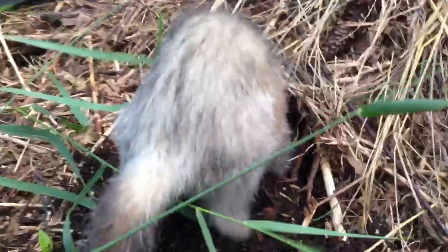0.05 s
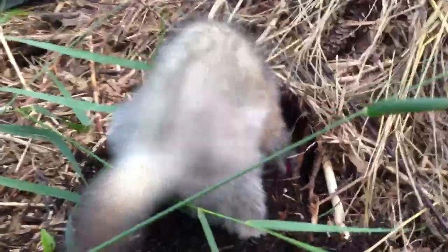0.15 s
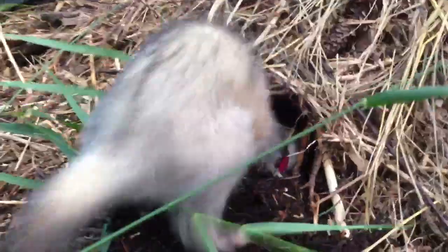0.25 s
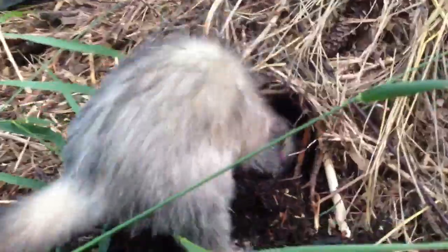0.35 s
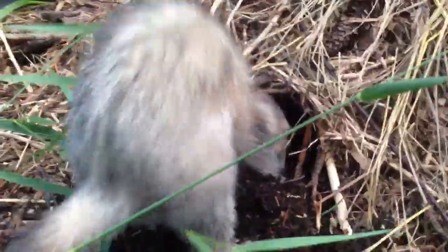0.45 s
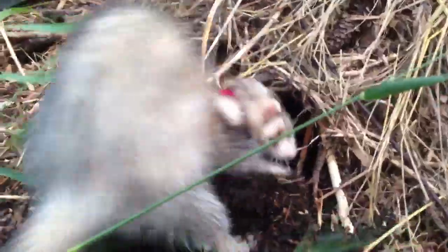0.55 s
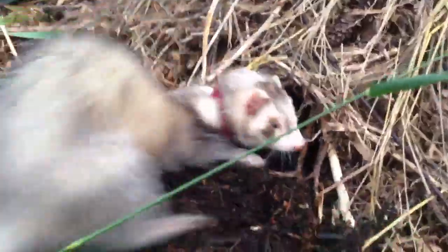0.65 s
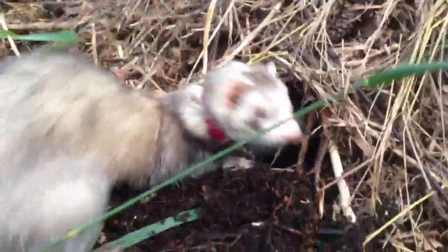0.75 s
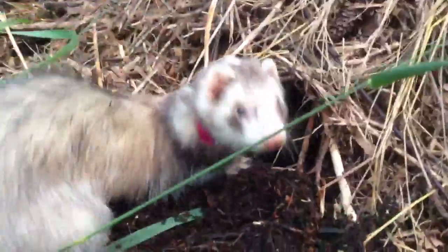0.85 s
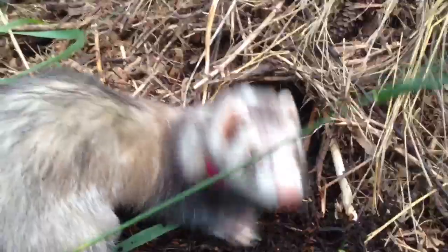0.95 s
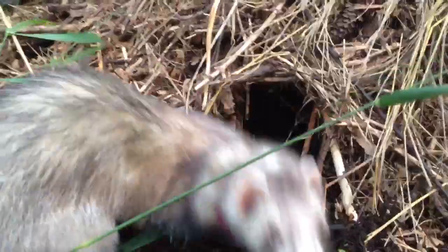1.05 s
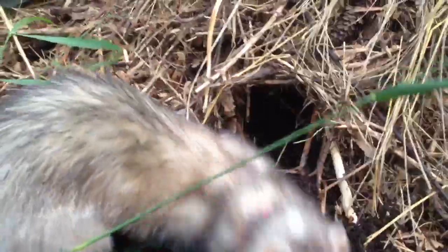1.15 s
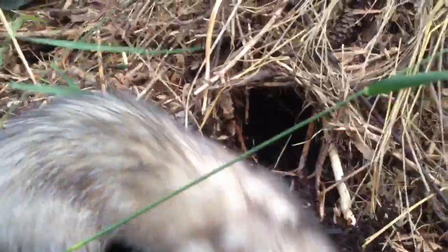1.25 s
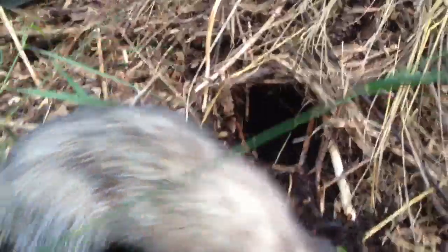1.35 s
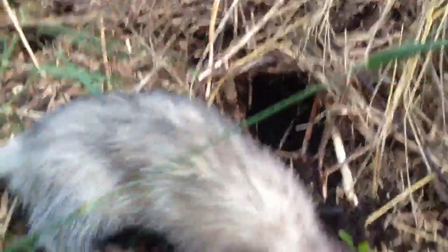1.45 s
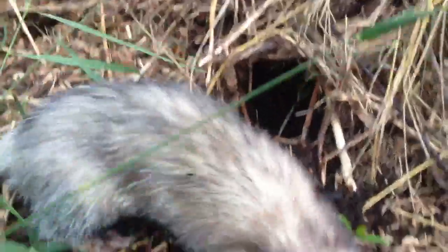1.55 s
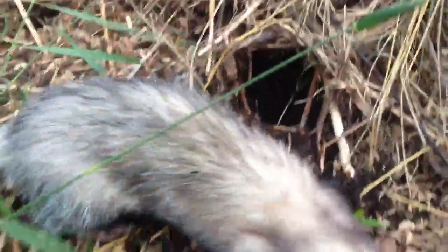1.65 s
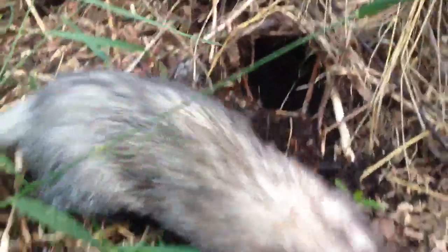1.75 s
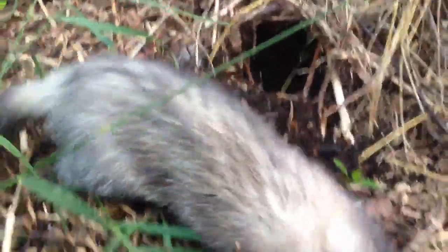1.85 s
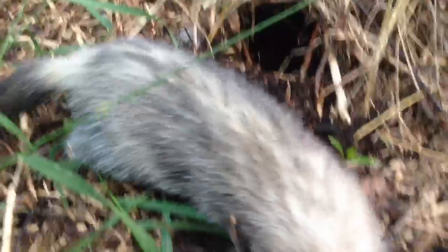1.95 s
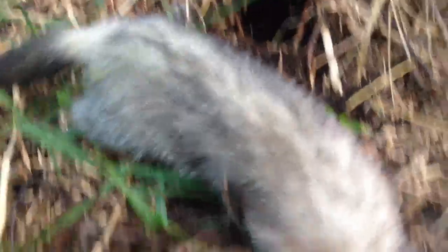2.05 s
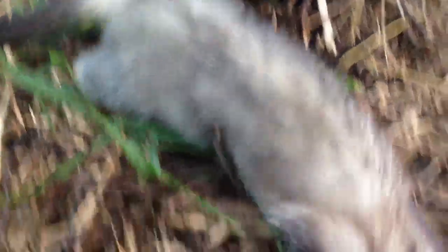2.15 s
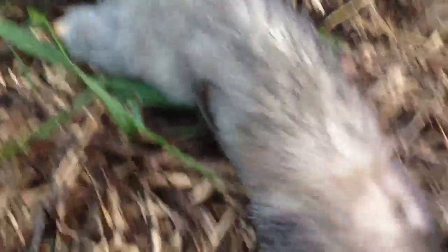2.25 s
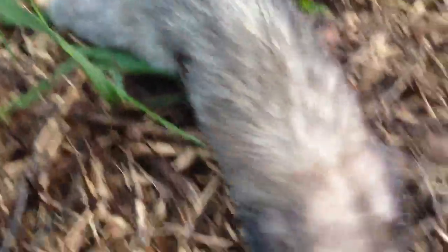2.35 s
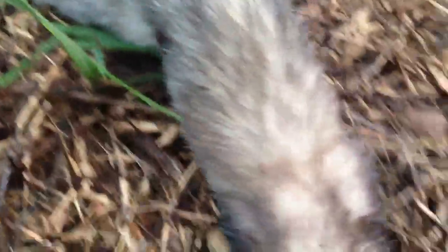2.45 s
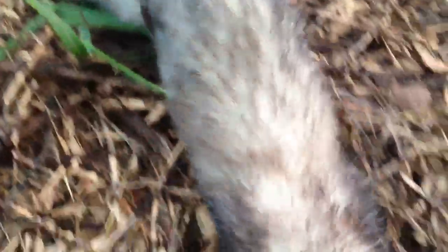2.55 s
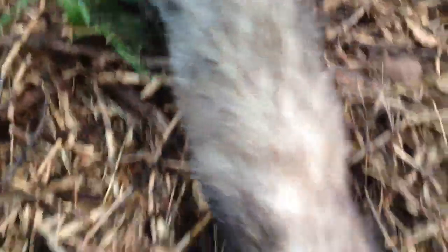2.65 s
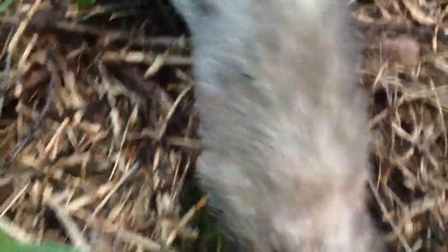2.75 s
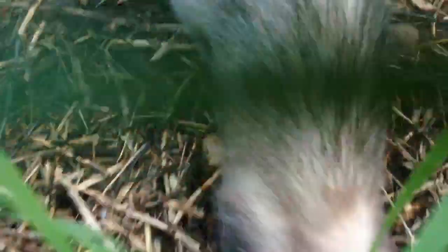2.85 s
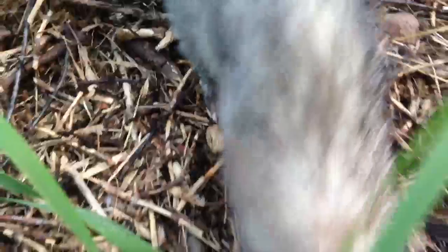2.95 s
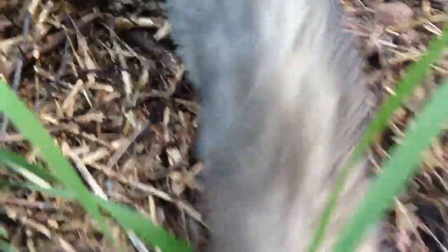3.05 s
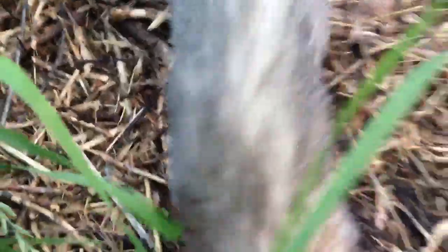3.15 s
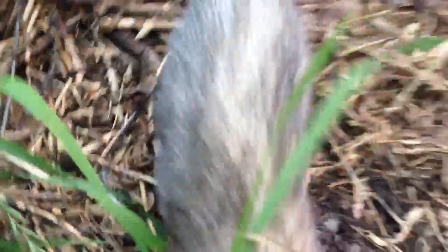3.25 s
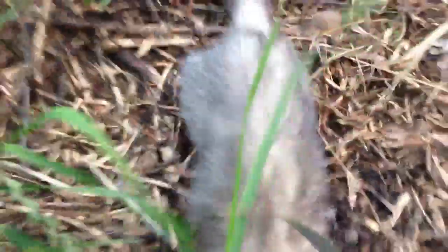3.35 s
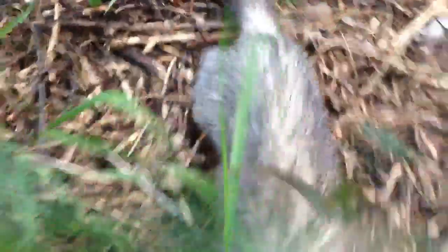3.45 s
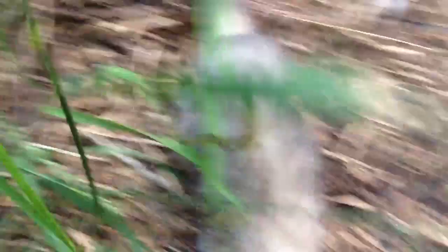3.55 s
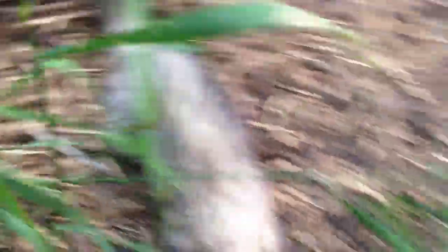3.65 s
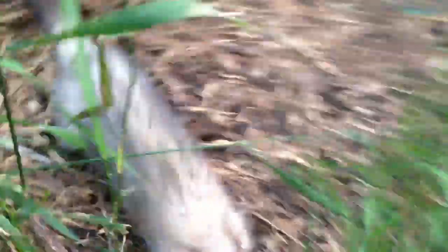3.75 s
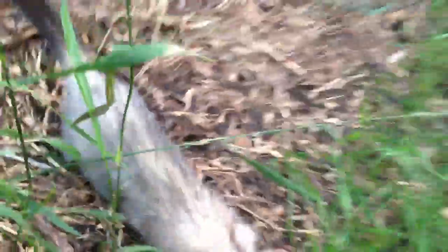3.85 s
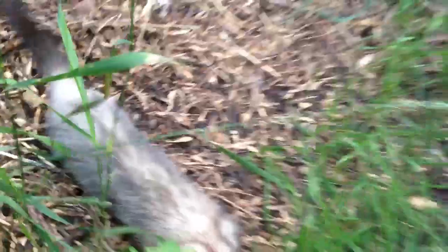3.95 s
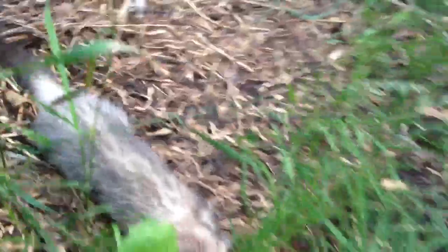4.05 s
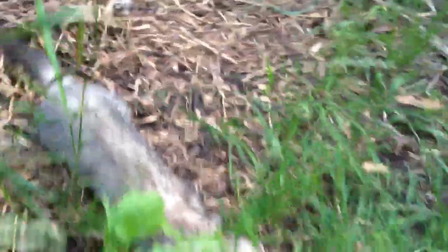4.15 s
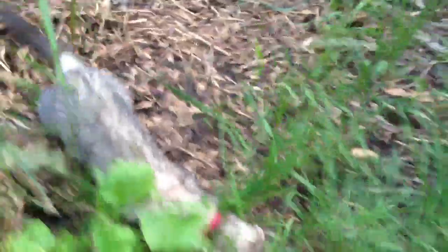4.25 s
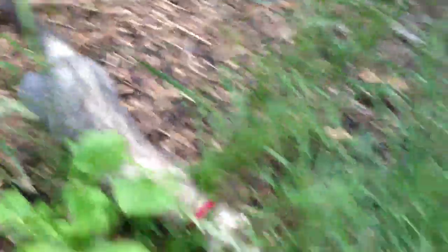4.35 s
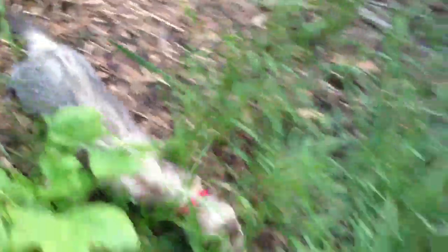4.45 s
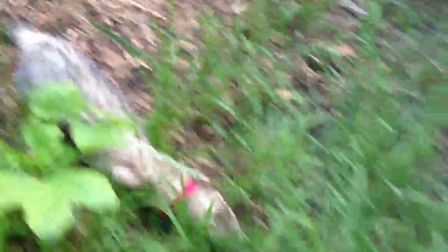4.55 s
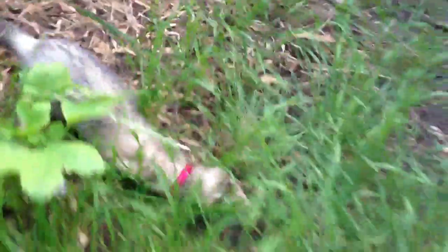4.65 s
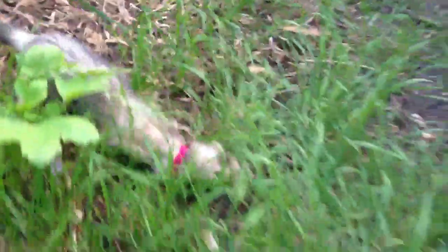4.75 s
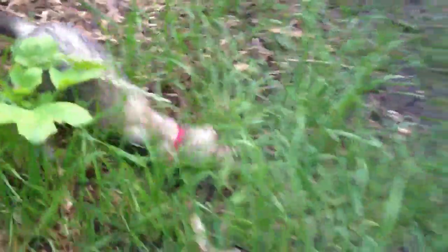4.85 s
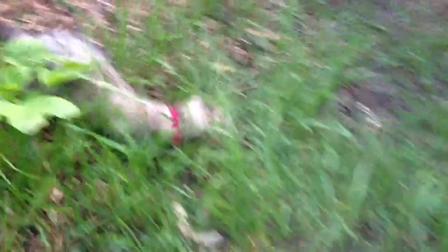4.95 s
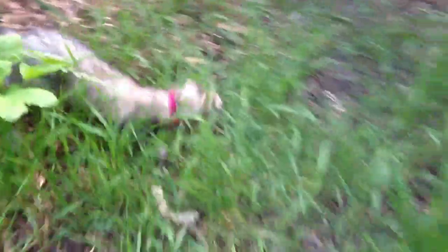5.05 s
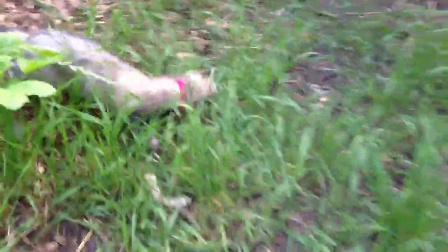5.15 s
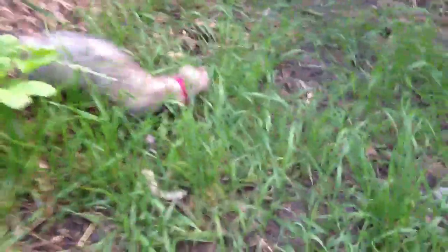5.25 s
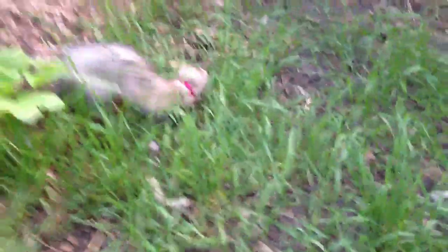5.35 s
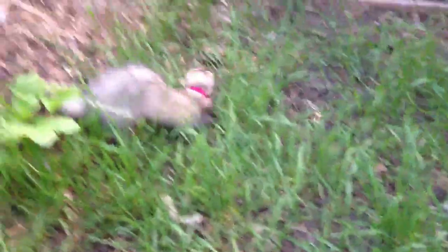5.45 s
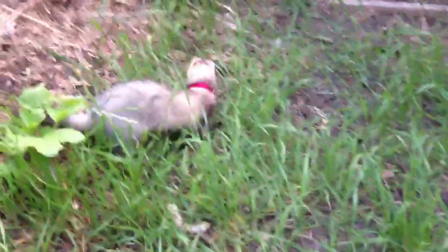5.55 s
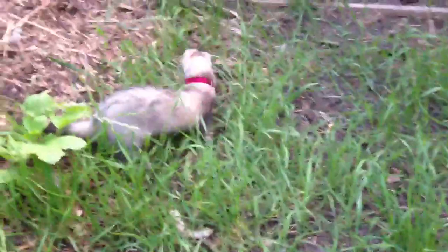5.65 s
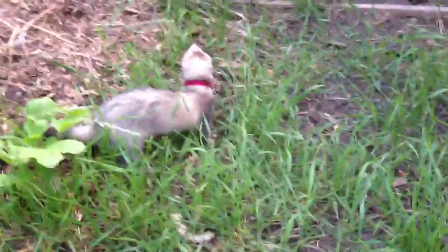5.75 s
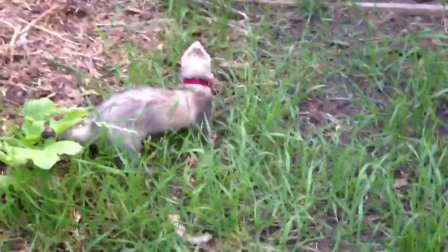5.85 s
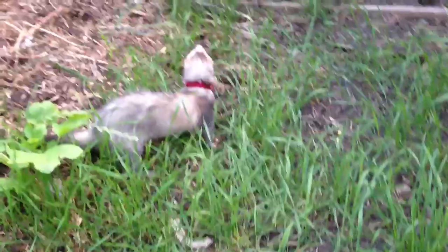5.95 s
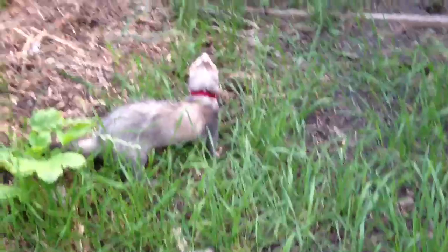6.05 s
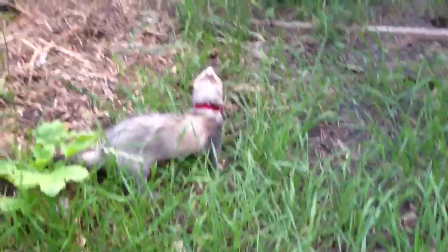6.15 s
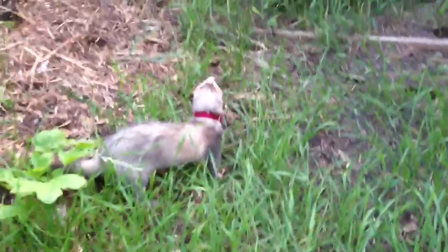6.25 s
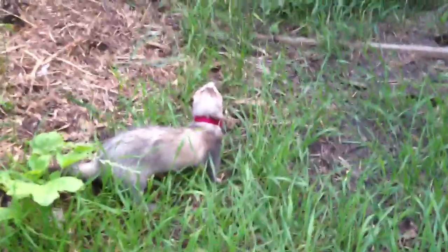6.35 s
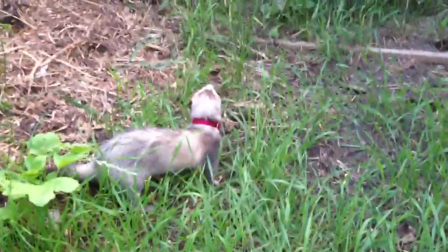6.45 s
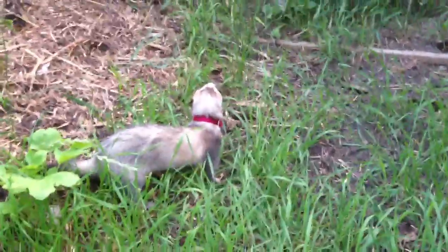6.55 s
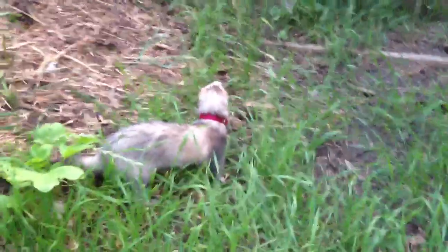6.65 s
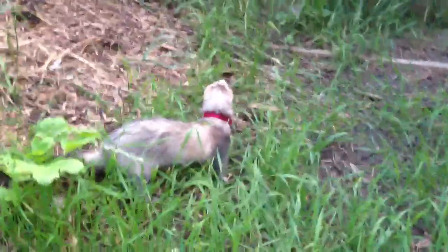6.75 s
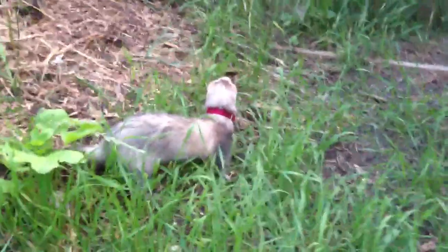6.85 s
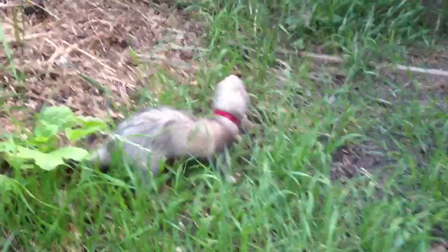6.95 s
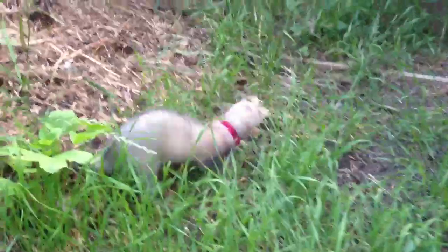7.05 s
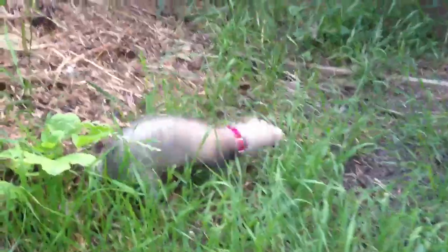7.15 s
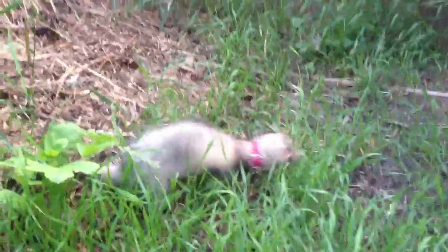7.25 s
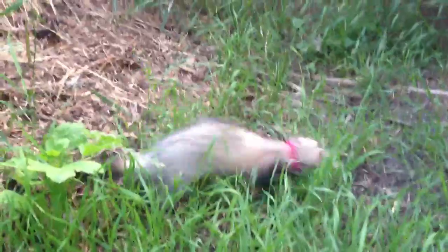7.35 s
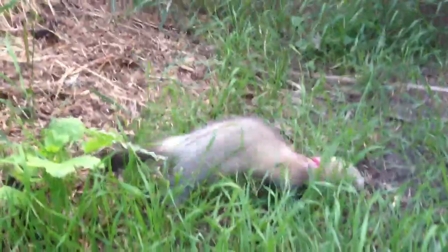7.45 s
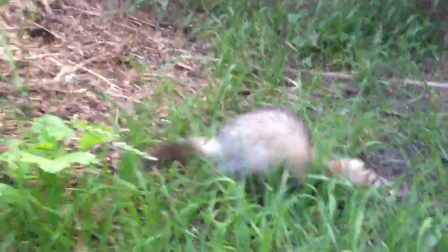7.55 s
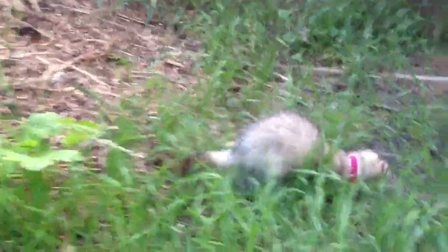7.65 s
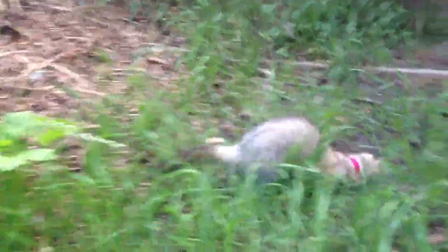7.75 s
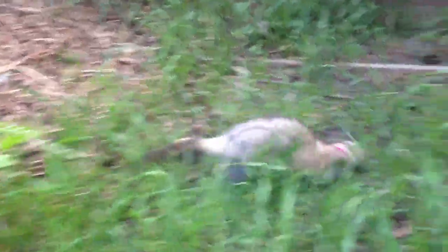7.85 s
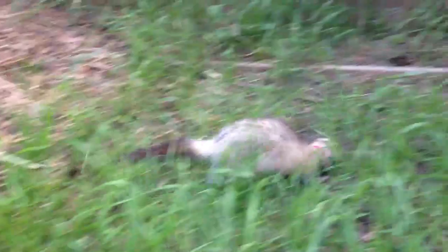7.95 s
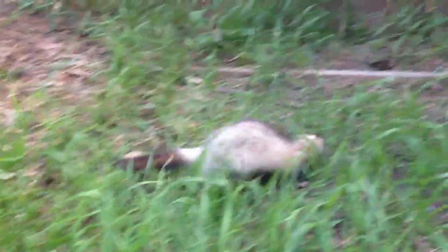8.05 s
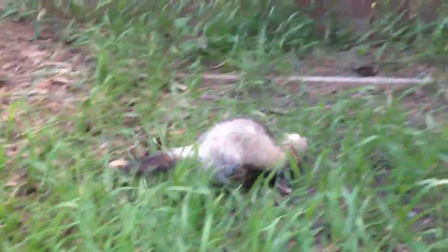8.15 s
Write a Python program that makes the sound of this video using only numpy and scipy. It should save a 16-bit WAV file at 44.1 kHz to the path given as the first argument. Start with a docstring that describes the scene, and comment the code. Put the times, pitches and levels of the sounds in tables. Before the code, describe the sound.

A tiny bell on a ferret's collar tinkles close by in high, irregular clusters while dry straw crackles and stalks snap. A twig cracks, paws thud softly, and the rustling turns to swishing grass. The bell falls almost silent for a moment, then returns with its loudest, busiest jingling. Far off, an engine drones over low traffic, with a faint bird and a light breeze.

```python
"""A ferret digs in dry straw and scampers off through grass, rattling the tiny bell on its collar.
A loose pellet hits and skitters over the bell's slotted shell, making clusters of high pings.
Slipping fibres make the straw crackle and the grass swish; stalks snap, twigs crack and paws thud.
Far away an engine drones over rumbling traffic and a bird calls faintly, with a light breeze
in the leaves and a soft, steady hiss."""
import sys
import numpy as np
from scipy import signal
from scipy.fft import rfft, irfft, next_fast_len
from scipy.io import wavfile
from scipy.ndimage import uniform_filter1d, map_coordinates

SR = 44100
rng = np.random.default_rng(int(sys.argv[2]) if len(sys.argv) > 2 else 0)


def wav_out(sig):
    """Save sig, one row per channel (or a flat mono array), as 16-bit PCM at SR to the path in sys.argv[1]."""
    wavfile.write(sys.argv[1], SR, np.round(np.clip(np.atleast_2d(sig).T, -1, 1) * 32767).astype(np.int16))


N = 361002

SHELL_HZ, UPPER_HZ = 5777, 13500  # the main and upper tones of the bell's shell
# tone colour of dry straw: f/Hz, level/dB
STRAW_SPECTRUM = [(500, -46), (2500, -13.5), (4500, 2), (7000, 1.5), (10000, -1), (13000, -2.5),
                  (16000, -6.5)]


def amp(db):
    """Turn decibels into a gain."""
    return 10 ** (np.asarray(db) / 20)


def unit(x):
    """Scale a sound to an average power of 1."""
    return x / np.sqrt(np.mean(x ** 2) + 1e-20)


def curves(rows):
    """Join the points of a table over time: one smooth line for each column after the first."""
    times, *columns = np.transpose(rows)
    return [np.interp(np.arange(N) / SR, times, column) for column in columns]


def wobble(rate):
    """A smooth random curve through `rate` points a second."""
    points = rng.standard_normal(int(N * rate / SR) + 4)
    return map_coordinates(points, [np.arange(N) * rate / SR])


def filtered(x, response):
    """Scale each frequency of a sound by response(hz)."""
    size = next_fast_len(N + SR // 2)
    return irfft(rfft(x, size) * response(np.fft.rfftfreq(size, 1 / SR)), size)[:N]


def coloured(x, spectrum):
    """Shape a sound's tone colour by rows of f/Hz, level/dB."""
    f, db = np.transpose(spectrum)
    return filtered(x, lambda hz: amp(np.interp(np.log(hz + 1), np.log(f), db)))


def noise(spectrum):
    """Steady noise with the given tone colour."""
    return unit(coloured(rng.standard_normal(N), spectrum))


def add(track, s, sound):
    """Mix a sound into the track, starting s seconds in."""
    start = max(round(s * SR), 0)
    part = track[start:start + len(sound)]
    part += sound[:len(part)]


def fade(t, t60):
    """Stay at 1 until t = 0, then die away by 60 dB every t60 seconds."""
    return amp(-60 * np.maximum(t, 0) / t60)


def resonance(f, hz, width):
    """How an object that likes to ring at hz responds to frequency f."""
    return 1j * f * width / (hz * hz - f * f + 1j * f * width)


def bursts(rows, t60):
    """A short puff of noise for each row of t/s, level/dB."""
    out, t = np.zeros(N), np.arange(SR // 20) / SR
    for s, db in rows:
        add(out, s, amp(db) * fade(t, t60) * rng.standard_normal(len(t)))
    return out


def patchy(x, depth_db):
    """Give a noise drifting louder and softer patches across pitch and time."""
    spectra = signal.stft(x, nperseg=1024)[2]
    patches = uniform_filter1d(rng.standard_normal(spectra.shape), size=4, axis=0)
    patches = unit(uniform_filter1d(patches, size=9, axis=1))
    return unit(signal.istft(spectra * amp(depth_db * patches), nperseg=1024)[1][:N])


def traffic():
    """Distant traffic rumbles in two low bands of wavering noise."""
    # tone colour of each band: f/Hz, level/dB
    low_spectrum = [(20, -44), (55, -32.5), (85, -20.5), (105, -11), (150, 0.5), (185, 0), (230, -8),
                    (300, -20.5), (600, -44)]
    upper_spectrum = [(100, -32), (170, -14.5), (215, 3), (260, -3), (330, -9), (450, -15), (650, -20),
                      (1500, -56)]
    # slow rise and fall of each band: t/s, level/dB
    low_levels = [(0, -57), (2.6, -58), (5.0, -61), (6.8, -65), (8.19, -64)]
    upper_levels = [(0, -66.5), (1.4, -64.5), (3.1, -59), (4.0, -63.5), (5.0, -60), (6.8, -67.5),
                    (8.19, -64)]
    (low_db,), (upper_db,) = curves(low_levels), curves(upper_levels)
    low = amp(low_db + 3.5 + 1.1 * wobble(5.8)) * noise(low_spectrum)
    upper = amp(upper_db + 3.5 + 2.2 * wobble(7)) * noise(upper_spectrum)
    return low + upper


def breeze():
    """A light breeze swells and eases in the leaves."""
    # tone colour of the leaves: f/Hz, level/dB
    leaf_spectrum = [(100, -39), (300, 2.5), (550, 2), (1000, 1.5), (1600, -2), (2100, -5), (2750, -5),
                     (3200, -9.5), (6000, -15), (16000, -30)]
    # strength of the breeze: t/s, level/dB
    wind_levels = [(0, -69.5), (1.2, -68.5), (3.1, -65.5), (4.5, -58.5), (6.1, -63.5), (7.3, -67.5),
                   (8.19, -68.5)]
    (wind_db,) = curves(wind_levels)
    leaves = patchy(noise(leaf_spectrum), depth_db=2.2)
    return amp(wind_db + 3 + 0.71 * wobble(8.1)) * leaves


def engine(start_hz=109.75, sag_hz_per_s=0.77):
    """A far engine sinks slowly in pitch while its harmonics (multiples of the pitch) swell and fade."""
    # strength of harmonics 1, 3 and 4: t/s, level/dB, level/dB, level/dB
    harmonic_levels = [(0, -60.5, -66.5, -70.5), (3.0, -58, -78, -71), (3.6, -60.5, -63.5, -75.5),
                       (4.8, -65, -64, -70), (5.6, -65.5, -60, -82), (6.7, -68.5, -60, -86),
                       (7.2, -71.5, -65, -75), (8.19, -77, -65, -78)]
    first_db, third_db, fourth_db = curves(harmonic_levels)
    hz = start_hz - sag_hz_per_s * np.arange(N) / SR
    phase = 2 * np.pi * np.cumsum(hz + 0.2936 * wobble(5.4)) / SR
    levels = [first_db, first_db - 1.5, third_db - 0.5, fourth_db + 1, third_db - 16]
    harmonics = (amp(db + 0.92 * wobble(3.97)) * np.sin(k * phase) for k, db in enumerate(levels, 1))
    return np.sqrt(2) * sum(harmonics)


def hiss():
    """A soft, steady hiss lies under everything."""
    # tone colour of the hiss: f/Hz, level/dB
    hiss_spectrum = [(100, -8), (1000, -11.5), (4000, -2), (8000, 1), (16000, 2)]
    return amp(-70) * noise(hiss_spectrum)


def strokes(rise_share=0.42, drop_db=12):
    """Strength of the crackle and the swish: each push of paw or flank swells, then fades more slowly."""
    # pushes through the ground cover: peak t/s, length/s, straw level/dB, grass level/dB
    pushes = [(0.498, .04, -61, -67), (0.621, 0.086, -55, -59), (0.69, 0.085, -62, -76),
              (0.787, 0.29, -62, -66.5), (0.974, 0.13, -65, -76), (1.404, 0.18, -64, -71),
              (1.845, .08, -68, -62), (1.909, .04, -56, -57), (2.0, .05, -55, -63), (2.07, .03, -56, -61.5),
              (2.17, 0.18, -64.5, -76), (2.37, .03, -63, -63), (2.682, 0.14, -59.5, -74),
              (2.79, 0.31, -62.5, -60.5), (2.969, .07, -56.5, -60), (3.067, 0.18, -65, -67),
              (3.557, 0.042, -56, -49), (3.654, 0.19, -60, -58.5), (3.791, 0.14, -60, -52),
              (3.84, 0.18, -54, -51.5), (4.188, .14, -70, -55), (4.388, 0.36, -75, -53.5),
              (4.51, 0.18, -71, -48), (4.522, 0.021, -68, -43.5), (4.62, 0.22, -64, -63),
              (4.858, 0.15, -66, -60), (5.205, 0.18, -57.5, -51), (5.48, 0.24, -67, -60.5),
              (7.12, .08, -58.5, -67), (7.182, 0.064, -56, -64), (7.244, 0.037, -51, -60),
              (7.31, 0.075, -56, -66), (7.43, .2, -63.5, -75), (7.654, .07, -62, -78),
              (7.75, .05, -62, -74)]
    t, power = np.arange(N) / SR, np.zeros((2, N))
    for s, length, straw_db, grass_db in pushes:
        near = np.abs(t - s) < 2 * length
        # 0 at the peak, 1 at either end of the push
        away = np.maximum((s - t[near]) / rise_share, (t[near] - s) / (1 - rise_share)) / length
        power[:, near] += np.outer(amp([straw_db, grass_db]), amp(-drop_db * away)) ** 2
    return np.sqrt(power)


def fibre_slips(per_s, spread_db, clump_db):
    """Fibres slip with tiny clicks of very unequal size, louder in clumps."""
    slips = (rng.random(N) < per_s / SR) * rng.standard_normal(N)
    return slips * amp(spread_db * rng.standard_normal(N) + clump_db * wobble(90))


def rustle():
    """Paws crackle in brittle straw and the body swishes through supple grass."""
    # light stirring under the moving body: t/s, level/dB
    stir_levels = [(0, -75), (1.2, -74), (1.7, -65), (2.5, -69.5), (3.4, -67), (4.2, -70), (5.3, -71),
                   (5.8, -80), (6.95, -76), (7.3, -68.5), (8.19, -71)]
    # tone colour of grass: f/Hz, level/dB
    grass_spectrum = [(300, -46), (1200, -9), (2400, -2.5), (3600, 0.5), (5000, -2.5), (7000, -9),
                      (10000, -17), (16000, -18.5)]
    (stir_db,), (crackle, swish) = curves(stir_levels), strokes()
    brittle = fibre_slips(per_s=6000, spread_db=3, clump_db=2.2)
    supple = fibre_slips(per_s=12000, spread_db=2.5, clump_db=1.4)
    straw = amp(2.5) * np.hypot(crackle, amp(stir_db)) * unit(coloured(brittle, STRAW_SPECTRUM))
    grass = amp(0.5) * np.hypot(swish, amp(stir_db - 5)) * unit(coloured(supple, grass_spectrum))
    return straw + grass


def stalks():
    """Dry stalks snap with short, bright clicks."""
    # snapping stalks: t/s, level/dB
    snaps = [(0.1324, -53), (0.6335, -48), (0.6834, -48), (0.7774, -51), (0.865, -40), (0.9023, -50),
             (1.109, -49.5), (1.144, -47), (1.8344, -52), (1.8504, -41), (1.9114, -47), (2.0654, -48),
             (2.2214, -46), (2.367, -46), (2.6628, -52), (2.9764, -41), (2.9851, -42), (3.1009, -50),
             (3.5544, -46), (3.5624, -46)]
    return amp(2.5) * coloured(bursts(snaps, t60=0.0097), STRAW_SPECTRUM)


def jiggles(per_s=42, scatter_db=2.5, t60=0.038):
    """The shaking collar makes light, uneven strikes, listed as t/s, level/dB, ring time/s."""
    # spells of shaking: start t/s, end t/s, typical level/dB
    shakes = [(0.45, 0.553, -41), (0.81, 0.85, -49), (0.97, 1.02, -49), (1.13, 1.40, -53.5),
              (1.90, 2.32, -46.5), (2.76, 2.84, -45), (2.93, 3.077, -49.5), (3.31, 3.475, -52),
              (3.74, 3.89, -46.5), (4.48, 4.70, -47), (5.24, 5.389, -45), (5.45, 5.51, -52),
              (6.08, 6.12, -54.5), (7.11, 7.372, -35), (7.72, 7.79, -40), (7.94, 8.19, -45.5)]
    count = int(N / SR * per_s)
    times = (np.arange(count) + rng.random(count)) / per_s
    size, life = rng.standard_normal((2, count))
    return [(times[k], db + scatter_db * size[k], t60 * np.exp(.5 * life[k]))
            for start, end, db in shakes for k in np.flatnonzero((times > start) & (times < end))]


def pings(strikes, flight_s=0.013, attack_s=0.00017, split_hz=110, upper_ring_ratio=1.26):
    """Each strike rings the shell until the pellet lands again and damps it."""
    # upper tone compared with the main one, as the bell turns on the collar: t/s, level/dB
    upper_levels = [(0.5, -26), (1.7, -34), (1.87, -22.5), (2.25, -23), (2.85, -23), (3.1, -32),
                    (3.85, -21), (4.5, -36), (5.3, -30), (7.1, -30.5), (7.32, -25.5), (7.75, -24),
                    (7.9, -32), (8.19, -20)]
    # faint tones that ring on freely: f/Hz, level/dB, ring time/s
    free_tones = [(5850, -19.5, 0.1), (6140, -44, 0.16), (5000, -31.5, 0.037), (13410, -48, .09)]
    out, t = np.zeros(N), np.arange(SR // 7) / SR
    tone = lambda hz: np.sin(2 * np.pi * (hz * t + rng.random()))
    gaps = np.diff([row[0] for row in strikes], append=N / SR)
    for (s, db, t60), gap in zip(strikes, gaps):
        chance = rng.standard_normal(6)
        # the ring fades faster once the pellet lands, and the next strike chokes it
        ring = fade(t, t60) * fade(t - flight_s, 0.028) * fade(t - gap, 0.0037)
        main = ring * tone(SHELL_HZ + 10 * chance[0])
        # the slot splits the upper tone into a close pair
        pair = sum(tone(UPPER_HZ + 20 * chance[1] + side * split_hz) for side in (-.5, .5))
        upper_db = np.interp(s, *np.transpose(upper_levels)) + 1.5 * chance[5]
        upper = amp(upper_db) * ring ** (1 / upper_ring_ratio) * pair
        # while it touches, the pellet weighs on the shell: a lower, very short ping
        contact = amp(-7.5 + 2 * chance[2]) * fade(t, 0.016) * tone(5520 + 160 * chance[3])
        after_ring = sum(amp(level) * fade(t, life) * tone(hz) for hz, level, life in free_tones)
        tick = amp(-26 + 3.5 * chance[4]) * fade(t, 0.0029) * rng.standard_normal(len(t))
        ping = (1 - np.exp(-t / attack_s)) ** 2 * (main + upper + contact + after_ring + tick)
        add(out, s, amp(db) * ping)
        # echoes from the ground and nearby things, whose delays change as the collar moves
        for delay, size in zip(rng.uniform(.002, .009, size=2), rng.standard_normal(2)):
            add(out, s + delay, amp(db - 13.5 + 2 * size) * ping)
    return out


def skitter(strikes, taps_per_s=260, motion_t60=0.18, ring_hz=5660, ring_t60=0.0077, run_up_s=.008):
    """Just before and after each strike the pellet skitters over the shell in tiny, damped taps."""
    taps, t = np.zeros(N), np.arange(SR // 10) / SR
    for s, db, _ in strikes:
        touches = (rng.random(len(t)) < taps_per_s / SR) * rng.choice([-1, 1], len(t))
        motion = np.minimum(t / run_up_s, 1) ** 2 * fade(t - run_up_s, motion_t60)
        strength = amp(db - 18 + 4 * rng.standard_normal(len(t)))
        add(taps, s - run_up_s / 2, touches * motion * strength)
    tones = np.sin(2 * np.pi * ring_hz * t) + amp(-25) * np.sin(2 * np.pi * 13300 * t)
    ping = (1 - np.exp(-t / 0.000185)) ** 2 * fade(t, ring_t60) * tones
    return signal.fftconvolve(taps, ping)[:N]


def collar_bell():
    """The pellet rattles in a small shell, which passes sound to the air best near its two tones."""
    # hard strikes of the pellet: t/s, level/dB, ring time/s
    hard_strikes = [(0.4574, -24, 0.0065), (0.4735, -33.5, 0.032), (0.4895, -26, 0.017),
                    (0.5011, -21.5, 0.019), (0.5202, -33, .04), (0.5684, -27, .021), (0.594, -34, .015),
                    (0.8654, -41.5, .006), (1.0298, -37, .023), (1.1581, -29, 0.024), (1.2157, -47, .012),
                    (1.3976, -39, .015), (1.4137, -33.5, 0.014), (1.6695, -35, 0.029),
                    (1.732, -27.5, 0.042), (1.8345, -33, .036), (1.8425, -32, .08), (1.861, -15, 0.048),
                    (1.876, -28, 0.017), (1.9139, -34.5, 0.043), (1.9822, -27, 0.015), (2.0204, -38, 0.017),
                    (2.087, -39.5, .007), (2.128, -35.5, .024), (2.175, -41.5, .05), (2.211, -32.5, .036),
                    (2.2232, -22.5, .023), (2.292, -29, .013), (2.313, -34, .03), (2.369, -33, 0.012),
                    (2.4933, -37, 0.02), (2.7212, -28, 0.022), (2.7455, -30.5, 0.027), (2.8064, -30, .01),
                    (2.8145, -25.5, .016), (2.821, -31, .032), (2.8723, -37, .014), (2.913, -33.5, 0.015),
                    (2.9644, -36, 0.02), (3.0656, -38, 0.024), (3.077, -30.5, .022), (3.085, -29, 0.018),
                    (3.3253, -42, .014), (3.368, -34, 0.022), (3.8301, -30, 0.036), (3.8882, -31.5, .007),
                    (4.4405, -30.5, 0.046), (4.4866, -36.5, .068), (4.5472, -15, 0.015),
                    (4.5544, -29, .039), (4.5779, -34, .01), (4.6278, -37, .018), (4.6477, -27, .01),
                    (4.9122, -40.5, .045), (4.9357, -42, .028), (4.9718, -39, .008), (5.0123, -44.5, 0.036),
                    (5.069, -39.5, 0.033), (5.1058, -33, 0.024), (5.293, -30, 0.097),
                    (5.3071, -33.5, 0.083), (5.374, -33, 0.0092), (5.9091, -51, .017), (5.9481, -44, .01),
                    (7.088, -27.5, 0.04), (7.0947, -26.5, 0.071), (7.1192, -27, .01),
                    (7.1236, -25.5, 0.037), (7.1405, -27, .05), (7.1445, -20.5, 0.036),
                    (7.178, -18.5, 0.051), (7.19, -25, .018), (7.2055, -26, .029), (7.243, -24, .02),
                    (7.2526, -17, 0.11), (7.259, -19, 0.026), (7.285, -22, .07), (7.2893, -13.5, .032),
                    (7.2945, -20, 0.02), (7.3173, -15.5, .022), (7.321, -13.5, 0.029), (7.336, -23, 0.046),
                    (7.3415, -24, .036), (7.356, -21, 0.007), (7.3781, -23, 0.029), (7.4029, -31, .022),
                    (7.4095, -27, 0.014), (7.4365, -30.5, 0.074), (7.4574, -31, 0.05),
                    (7.6587, -32.5, .042), (7.7285, -28.5, .021), (7.7418, -20.5, 0.018),
                    (7.7535, -26, .031), (7.8291, -22, 0.022), (7.8378, -20, 0.017), (7.8984, -28.5, .033),
                    (7.9147, -32, .017), (7.9952, -31.5, 0.026), (8.0594, -40, .028), (8.096, -42.5, 0.049),
                    (8.117, -41, .028)]
    rattle = sum(pings(strikes) + skitter(strikes) for strikes in (hard_strikes, jiggles()))
    shell = lambda f: resonance(f, SHELL_HZ, width=1700) + resonance(f, UPPER_HZ, width=2200)
    leak = amp(-15)  # a little of every frequency gets out
    return amp(0.77) * filtered(rattle, lambda f: (shell(f) + leak) / (1 + leak))


def far_bird(blur_per_s=400, edge_s=0.031):
    """Thin calls, each with a second tone an octave below, blurred by many paths through the trees."""
    # pitch and strength of the calls, one list each: t/s, f/Hz, level/dB
    calls = [
        [(1.45, 2180, -84), (1.56, 2270, -64), (1.62, 2380, -62.5), (1.76, 2450, -67), (1.9, 2500, -73),
         (2.1, 2410, -82)],
        [(5.98, 2190, -74), (6.11, 2165, -60), (6.23, 2090, -66), (6.38, 2190, -59), (6.55, 2180, -72)],
        [(7.2, 2500, -82), (7.3, 2370, -78), (7.38, 2234, -65), (7.48, 2240, -80)],
    ]
    out, t = np.zeros(N), np.arange(N) / SR
    blurred = lambda phase: wobble(blur_per_s) * np.sin(phase) + wobble(blur_per_s) * np.cos(phase)
    for call in calls:
        hz, db = curves(call)
        sounding = np.clip(np.minimum(t - call[0][0], call[-1][0] - t) / edge_s, 0, 1)
        phase = 2 * np.pi * np.cumsum(hz) / SR
        out += sounding * amp(db - 5) * (blurred(phase) + amp(-3) * blurred(phase / 2))
    return out


def twigs():
    """Twigs crack underfoot and give a short, woody ring."""
    # cracks: t/s, level/dB
    cracks = [(2.762, -28.5), (2.768, -32.5), (2.785, -34.5), (4.519, -39)]
    # tones at which the wood rings: f/Hz, width/Hz, level/dB
    wood_tones = [(660, 120, -5), (900, 62, -2.5), (1210, 92, 2), (1630, 220, -2.5), (2150, 200, -13),
                  (3520, 600, -13)]
    wood = lambda f: sum((-1) ** k * amp(db) * resonance(f, hz, width)
                         for k, (hz, width, db) in enumerate(wood_tones))
    return amp(10) * filtered(bursts(cracks, t60=0.02), wood)


def footfalls(t60=0.057):
    """Each step gives a dull thud, a band of noise around its pitch."""
    # soft steps on the mulch: t/s, peak level/dB, f/Hz
    steps = [(2.828, -47, 600), (2.975, -48.5, 520), (3.385, -61, 70), (4.248, -45.5, 750)]
    out, t = np.zeros(N), np.arange(SR // 8) / SR
    for s, db, hz in steps:
        band = signal.butter(2, [hz / np.sqrt(2), hz * np.sqrt(2)], "bandpass", fs=SR, output="sos")
        thud = signal.sosfilt(band, fade(t, t60) * rng.standard_normal(len(t)))
        add(out, s, amp(db) * thud / np.abs(thud).max())
    return out


def scene():
    """Mix the background and the ferret's sounds into one channel."""
    distance = traffic() + breeze() + engine() + far_bird()
    nearby = rustle() + stalks() + hiss() + twigs() + footfalls() + collar_bell()
    return (distance + nearby)[None]


def record(dry):
    """Cut off the very highest treble."""
    return filtered(dry[0], lambda hz: hz < 15450)[None]


dry = scene()
out = record(dry)
wav_out(out)
```